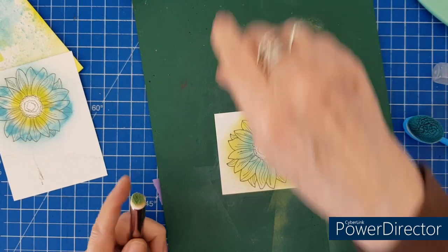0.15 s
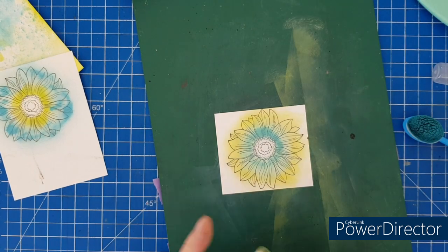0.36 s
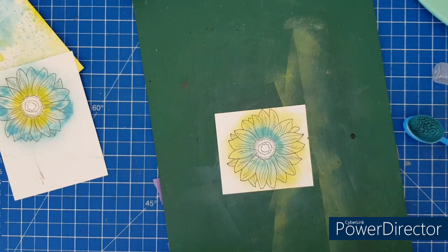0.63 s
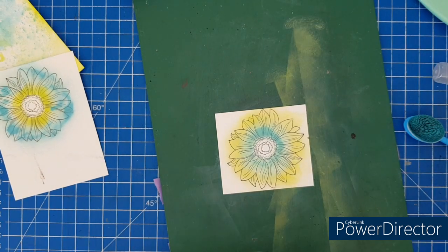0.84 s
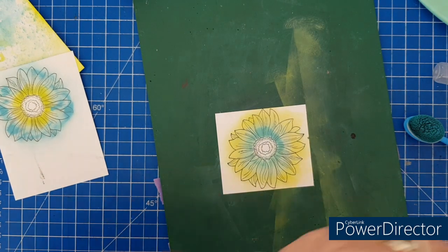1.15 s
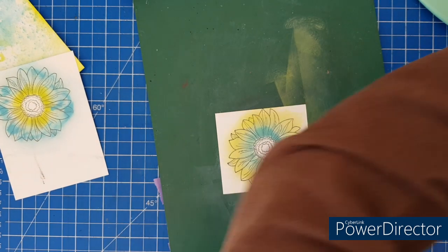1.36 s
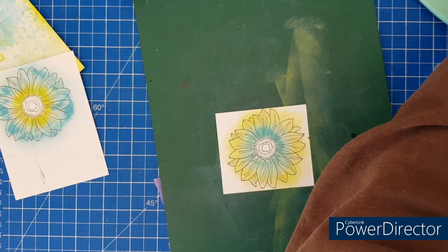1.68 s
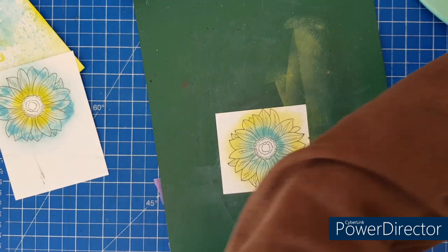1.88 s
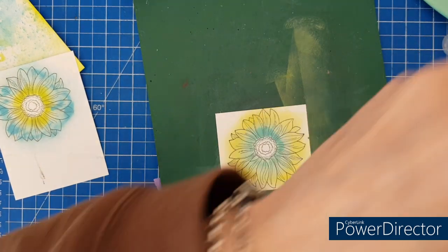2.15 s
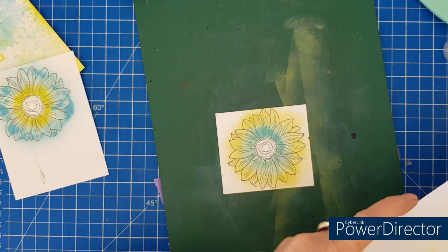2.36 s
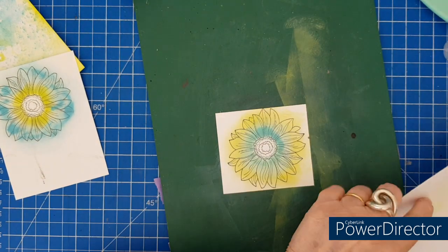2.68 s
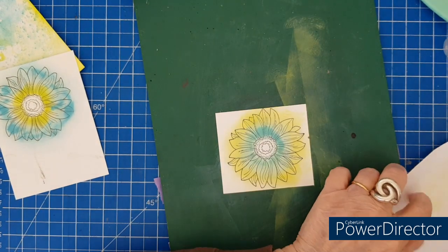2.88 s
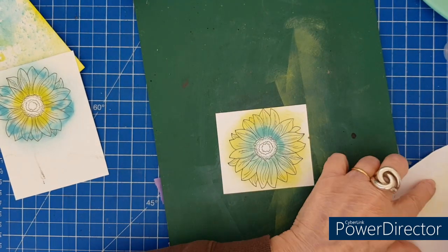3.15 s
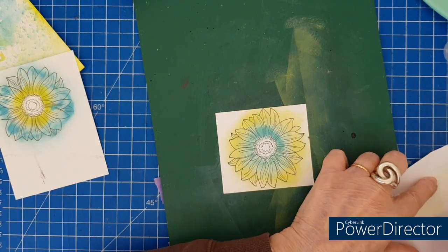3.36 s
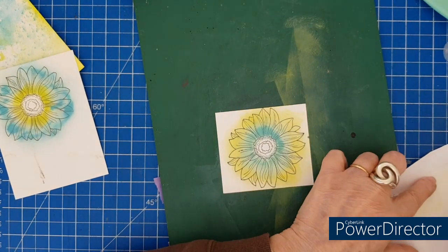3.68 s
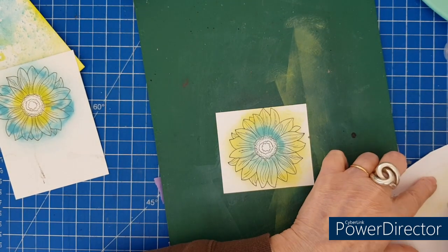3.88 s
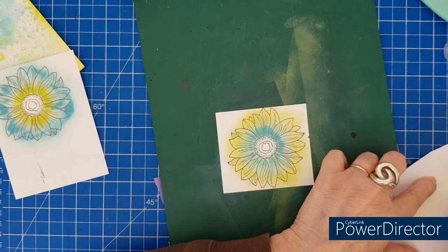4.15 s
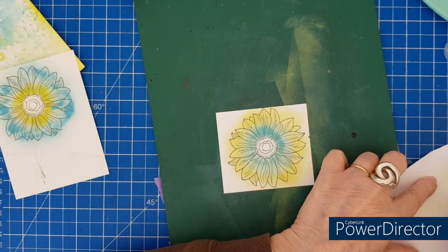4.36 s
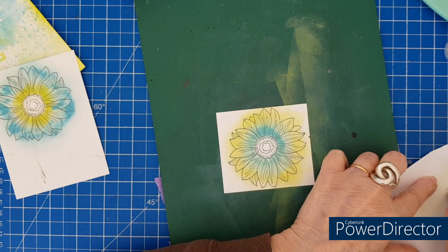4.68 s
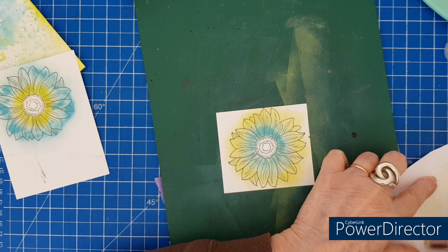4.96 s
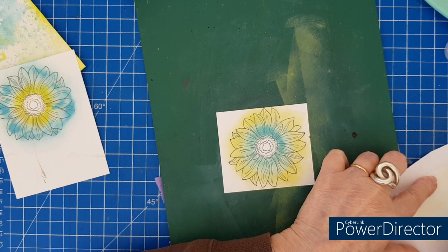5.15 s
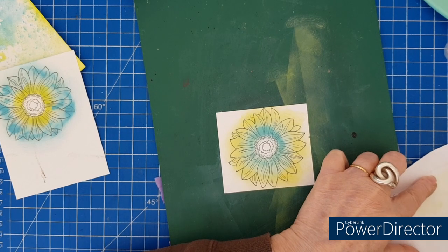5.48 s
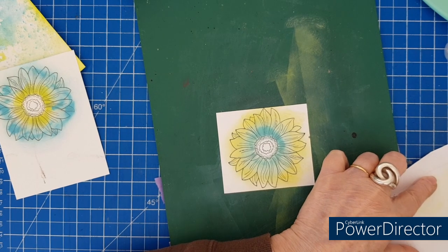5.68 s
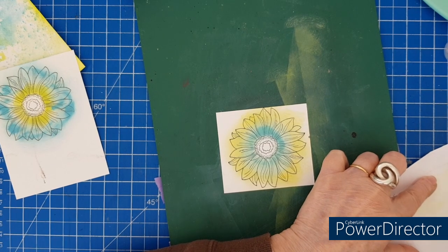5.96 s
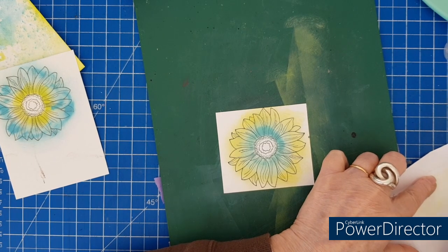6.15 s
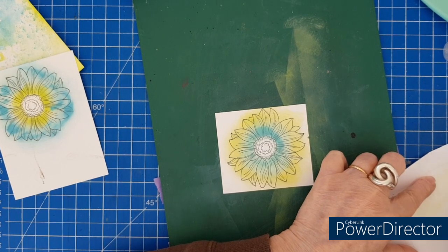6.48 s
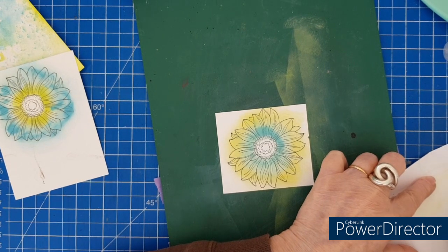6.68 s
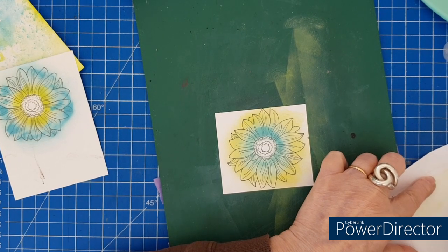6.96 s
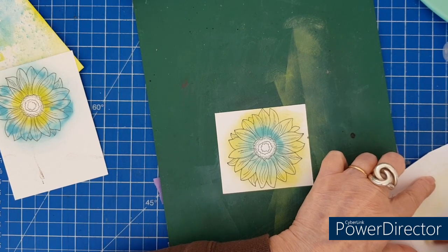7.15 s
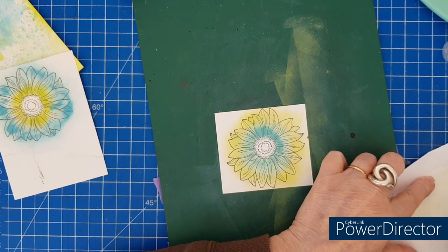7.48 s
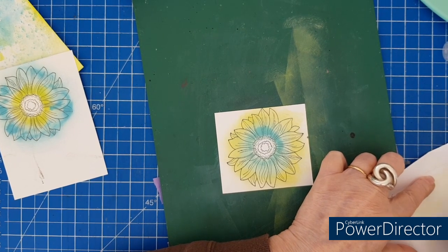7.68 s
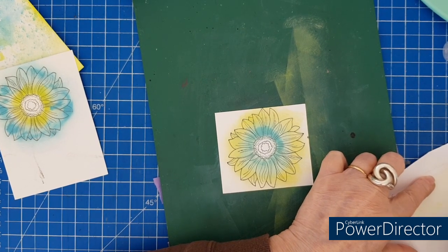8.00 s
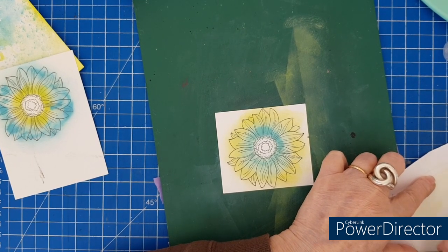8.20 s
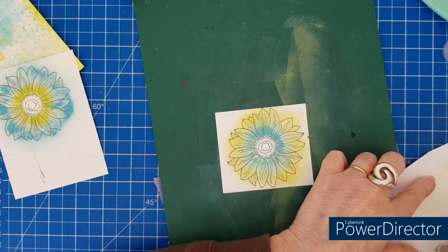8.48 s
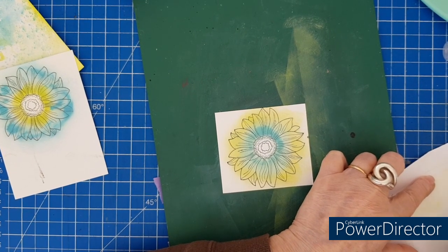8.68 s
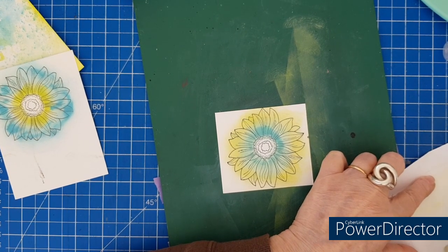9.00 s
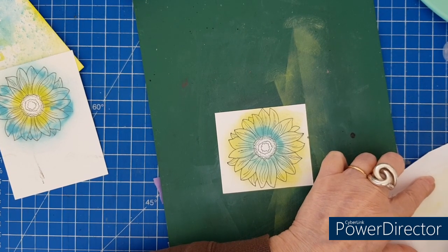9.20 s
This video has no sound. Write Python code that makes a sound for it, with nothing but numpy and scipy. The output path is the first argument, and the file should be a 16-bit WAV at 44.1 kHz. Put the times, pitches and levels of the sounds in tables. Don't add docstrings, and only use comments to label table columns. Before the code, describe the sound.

Card skids and knocks onto a craft mat, paper crinkles and snaps, then a soft brush scrubs quickly in two bouts in a quiet room.

```python
import sys
import numpy as np
from scipy import signal
from scipy.fft import rfft, irfft
from scipy.io import wavfile
from scipy.ndimage import uniform_filter1d, minimum_filter1d

SR = 44100
rng = np.random.default_rng(int(sys.argv[2]) if len(sys.argv) > 2 else 0)


def how_loud(loudness_db):
    steps = np.asarray(loudness_db, float) / 20
    return 10 ** steps


def waveform_to_disk(signal):
    frames = np.transpose(np.atleast_2d(signal))
    scaled = np.clip(frames, -1, 1) * 32767
    samples = np.round(scaled).astype(np.int16)
    wavfile.write(sys.argv[1], SR, samples)


N = 411453

# pitch_hz, level_db (per Hz)
BRISTLE_COLOUR = [(350, -51), (600, -34), (777, -13), (1150, -7), (1730, -15.5), (1900, -14.5), (2010, -16),
                  (2940, -6), (4870, -1), (8970, -2), (11100, 2.5), (14600, -2.5), (15400, -70)]
# start_s, length_s, level_db, table_jolt_db
FIRST_SCRUB = [(3.378, 0.063, -67, -57), (3.457, .11, -61.5, -80), (3.587, 0.074, -58.5, -60),
               (3.7, 0.1, -61, -50), (3.824, 0.068, -56, -73.5), (3.929, 0.065, -58.5, -82),
               (4.061, 0.075, -60, -54), (4.158, 0.062, -60.5, -55), (4.265, 0.089, -58.5, -51),
               (4.386, 0.045, -58, -47.5), (4.516, 0.082, -60, -48.5), (4.627, 0.048, -59, -49.5),
               (4.747, 0.073, -59, -49), (4.86, 0.056, -57, -57.5), (4.979, 0.1, -59, -75),
               (5.1, 0.079, -60.5, -51), (5.243, 0.049, -60, -61), (5.356, 0.061, -57.5, -44)]
# start_s, length_s, level_db, table_jolt_db
SECOND_SCRUB = [(5.98, 0.087, -62.5, -52), (6.117, 0.095, -61.5, -59), (6.263, 0.11, -60.5, -48),
                (6.415, 0.087, -62.5, -56.5), (6.526, 0.089, -61, -84.5), (6.656, 0.075, -62, -58),
                (6.782, 0.096, -64.5, -59), (6.898, 0.081, -62.5, -78), (6.999, 0.067, -58.5, -56),
                (7.121, 0.097, -60.5, -48.5), (7.248, 0.065, -57, -54.5), (7.374, 0.11, -61.5, -54.5),
                (7.502, 0.092, -59.5, -56.5), (7.629, 0.16, -62.5, -64), (7.76, 0.11, -62.5, -59),
                (7.897, 0.17, -64.5, -53), (8.037, 0.059, -59, -65.5), (8.165, 0.3, -69.5, -50),
                (8.306, 0.057, -59, -57.5), (8.448, 0.085, -63, -62), (8.584, 0.078, -63, -61),
                (8.706, .08, -64, -49), (8.828, 0.093, -61, -57), (8.951, 0.073, -62, -51),
                (9.081, 0.095, -62, -54.5), (9.203, 0.039, -62, -49.5), (9.265, 0.015, -59.5, -78),
                (9.306, 0.031, -58.5, -51.5)]
FRESH_HAND, TIRED_HAND = (19, 0.3, 0.34, 22), (52, -2.03, 1.3, 32)


def brush():
    lead_s = .007
    hz = np.fft.rfftfreq(N, 1 / SR)
    hiss = evened(irfft(rfft(spread(N, 1.56, 0.004, 0.1)) * how_loud(read(BRISTLE_COLOUR, hz)), N))
    low_hiss = signal.sosfilt(signal.butter(2, 8000, fs=SR, output="sos"), hiss)
    hiss_level, low_level = np.zeros((2, N))
    whisk = np.zeros((2, N))
    for strokes, hand in [(FIRST_SCRUB, FRESH_HAND), (SECOND_SCRUB, TIRED_HAND)]:
        sag, low_db, back_db, swell = hand
        for k, (start_s, length_s, level_db, _) in enumerate(strokes):
            t = np.arange(0, length_s + 0.24, 1 / SR) - lead_s
            from_middle = np.clip(t, 0, length_s) - length_s / 2
            edge = np.clip((t + 0.0068) / 0.013, 0, 1) * how_loud(-350 * np.maximum(t - length_s, 0))
            drag = how_loud(level_db + 2.0 - sag * from_middle) * edge
            add(hiss_level, start_s - lead_s, drag)

            tip_hz = 4500 * (1 + .13 * rng.uniform(-1, 1))
            tips = band(spread(len(t), 3.0, .003, .3), 3000, 7000)
            tips = evened(resonate(tips, tip_hz, 1000))
            flick = np.exp(-.5 * ((t - .8 * length_s) / .022) ** 2)
            add(whisk, start_s - lead_s, tips * how_loud(level_db - 7.5) * flick)

            way_back = k % 2
            low_boost = how_loud(low_db + back_db * way_back + swell * from_middle) - 1
            add(low_level, start_s - lead_s, drag * low_boost)
    return patchy(hiss_level * hiss + low_level * low_hiss + whisk, 2.2)


# middle_s, length_s, body_db, body_hz, crinkle_db
CARD_SLIDES = [(0.662, 0.32, -69, 870, -73), (1.076, 0.3, -64.5, 660, -67), (1.13, 0.043, -81, 606, -60),
               (1.335, 0.17, -62.5, 595, -55.5), (1.572, .12, -79, 900, -67.5),
               (1.869, 0.23, -61, 1270, -49), (2.03, 0.077, -50.5, 850, -61.5),
               (2.101, 0.11, -41, 825, -57), (1.673, 0.09, -70, 1110, -62.5),
               (2.239, 0.28, -51, 900, -50.5), (2.605, .1, -44, 1450, -46),
               (2.678, 0.12, -51.5, 1050, -46.5), (2.862, 0.3, -67.5, 1140, -53),
               (3.001, 0.22, -64, 1460, -52.5), (3.189, 0.18, -70, 1540, -62), (8.186, .04, -54, 1200, -47),
               (5.4, .14, -60, 1400, -57), (6.277, .032, -49.5, 910, -45.5)]
# middle_s, length_s, fizz_db
SLEEVE_RUBS = [(0.088, .14, -55), (1.2, 0.085, -62.5), (1.438, 0.12, -63.5), (1.515, 0.1, -58.5),
               (1.643, 0.031, -52.5), (1.703, 0.11, -56), (2.006, 0.11, -60), (2.525, 0.12, -52),
               (3.125, 0.095, -66), (3.344, 0.31, -66)]
# start_s, length_s, body_db, body_hz, crinkle_db
CARD_CATCHES = [
    (1.263, 0.035, -65, 620, -53),
    (1.299, 0.038, -57, 1400, -46.5),
    (1.733, 0.032, -45.5, 1510, -49),
    (1.75, .06, -43.5, 950, -48),
    (2.123, 0.046, -38.5, 910, -43),
    (2.172, 0.069, -36.5, 900, -40.5),
    (2.324, 0.05, -47, 1020, -46.5),
    (2.372, 0.094, -50, 756, -71),
    (2.416, 0.07, -47, 740, -46),
    (2.453, .06, -44, 1150, -48),
]
# start_s, length_s, body_db, body_hz, crinkle_db
SHEET_SCUFFS = [
    (4.272, .08, -56, 820, -75),
    (4.75, 0.059, -52.5, 780, -77),
    (5.104, 0.11, -51.5, 860, -51),
    (6.264, 0.1, -51, 970, -49.5),
    (9.198, 0.09, -57.5, 1050, -72),
]
# start_s, length_s, body_db, body_hz, crinkle_db
SHEET_DRAGS = [
    (5.33, 0.24, -52, 910, -63),
    (8.15, .07, -59, 1140, -52),
    (1.705, 0.12, -54, 1030, -48.5),
]
# start_s, length_s, body_db, body_hz, crinkle_db
FIRST_SKID = [
    (0.0, .062, -33.5, 1464, -42.5),
]


def handling():
    out = np.zeros((2, N))
    card = [row + (row[-1] - 0.3,) for row in CARD_SLIDES]
    cloth = [(s, length_s, db - 16, 600, db - 16.5, db) for s, length_s, db in SLEEVE_RUBS]
    for middle_s, length_s, *sound in card + cloth:
        swell_db = -18 * np.linspace(-1, 1, round(length_s * SR)) ** 2
        add(out, middle_s - length_s / 2, paper(swell_db, *sound))
    kinds = [(CARD_CATCHES, (0.0015, 270, -4)), (SHEET_SCUFFS, (.004, 330, -9)),
             (SHEET_DRAGS, (0.036, 430, -1.8)), (FIRST_SKID, (0.0018, 120, -5))]
    for rows, (attack_s, fade, fizz_db) in kinds:
        for start_s, length_s, body_db, body_hz, crinkle_db in rows:
            t = np.arange(0, length_s, 1 / SR)
            shape_db = -fade * np.maximum(t - attack_s, 0) - 14 * np.maximum(1 - t / attack_s, 0)
            add(out, start_s, paper(shape_db, body_db, body_hz, crinkle_db, crinkle_db + fizz_db))
    return out


def paper(shape_db, body_db, body_hz, crinkle_db, fizz_db):
    count = len(shape_db)
    rub = grit(count, 3.2, .004)
    wide = spread(count, 3, .003, .3)
    hollow = evened(resonate(resonate(rub, body_hz, 330), body_hz, 330))
    body = evened(hollow + 1.1 * band(rub, .5 * body_hz, 2.3 * body_hz))
    crinkle = evened(band(wide, 2100, 4300) + .9 * band(wide, 3900, 7000))
    fizz = band(wide, 6000, 16000)
    sound = how_loud(body_db) * body + how_loud(crinkle_db) * crinkle + how_loud(fizz_db - 1.0) * fizz
    return how_loud(shape_db - 1.0) * sound * signal.windows.tukey(count, min(120 / count, 1))


# start_s, length_s, level_db, pitch_hz, width_hz
SINGING_EDGES = [(0.0, 0.047, -38, 1340, 200), (0.018, 0.036, -37.5, 1760, 260),
                 (0.0, 0.045, -44, 3200, 600), (0.0, .05, -49, 2560, 200), (0.01, 0.022, -53, 4980, 700),
                 (0.066, 0.02, -40, 600, 500), (0.066, 0.012, -48, 3900, 700), (1.0, 0.096, -57.5, 129, 30),
                 (1.14, 0.037, -62.5, 150, 50), (1.28, 0.078, -63, 505, 90), (2.078, 0.052, -37, 802, 90),
                 (2.126, 0.01, -43, 2200, 400), (2.17, 0.0075, -38, 1800, 400),
                 (2.372, 0.008, -44, 750, 400), (2.417, 0.025, -44.5, 575, 200),
                 (2.424, 0.009, -43, 1220, 300), (2.42, .008, -45, 3070, 400),
                 (2.585, 0.024, -44.5, 3500, 500), (2.686, .02, -60, 3260, 400),
                 (5.106, 0.05, -53, 4360, 800), (5.338, 0.034, -61, 1490, 300),
                 (5.365, 0.066, -59.5, 3050, 396), (5.4, 0.11, -65, 610, 500),
                 (7.892, 0.052, -58, 140, 60.3), (8.17, .05, -57.5, 140, 60), (8.7, .06, -58.5, 140, 60.1),
                 (6.0, 0.097, -59, 150, 70.3), (4.27, 0.059, -60, 182, 90), (2.811, 0.12, -61, 2920, 500),
                 (2.95, 0.083, -59, 3100, 600), (2.954, 0.083, -65, 5400, 600),
                 (3.107, 0.068, -65, 2920, 400), (1.678, .05, -61, 3200, 300),
                 (5.106, 0.057, -53.5, 131, 50), (1.601, 0.073, -59, 118, 40), (0.0, .05, -42, 800, 500),
                 (2.142, 0.057, -45.5, 1700, 700), (8.27, 0.024, -64, 4500, 900),
                 (8.115, .027, -65.5, 4600, 600)]


def singing():
    out = np.zeros(N)
    for start_s, length_s, level_db, pitch_hz, width_hz in SINGING_EDGES:
        t = np.arange(0, length_s + .05, 1 / SR)
        noise = rng.standard_normal(len(t) + 2000)
        tone = resonate(resonate(noise, pitch_hz, width_hz), pitch_hz, width_hz)
        tone = evened(tone[2000:])
        swing = uniform_filter1d(abs(tone), round(SR / width_hz / 2))
        tone = evened(tone / (.5 + swing))
        fade = how_loud(level_db - 1100 * np.maximum(t - length_s, 0))
        add(out, start_s, tone * np.minimum(t / .003, 1) * fade)
    return out


# start_s, peak_db, ring_hz, edge_db
HAND_KNOCKS = [(0.0291, -19.5, 1200, -44), (0.0645, -22, 700, -24), (0.0643, -24, 1250, -50),
               (7.8975, -51, 260, -75), (0.0836, -36, 610, -32), (8.1825, -46, 1050, -46),
               (1.1263, -55, 1080, -62), (1.3024, -54, 500, -46), (1.7333, -39, 1420, -52),
               (1.751, -47, 550, -55), (2.0027, -41, 840, -53), (2.0384, -34, 850, -48),
               (2.0805, -33, 760, -52), (2.1243, -29, 1100, -40), (2.1515, -32, 800, -42),
               (2.173, -28, 810, -36), (2.1784, -35, 790, -33), (2.1985, -36, 950, -42),
               (2.3266, -25, 1120, -42), (2.3673, -27, 950, -43), (2.4235, -36, 580, -42),
               (2.4519, -30, 1140, -40), (1.7615, -37, 1000, -46), (6.2694, -39, 900, -50),
               (2.5742, -36, 1250, -44), (2.5989, -36, 1070, -40), (2.6099, -34, 1400, -44),
               (4.2709, -40, 800, -58), (4.5146, -49, 750, -58), (4.7491, -39, 800, -60),
               (5.1045, -39, 900, -44), (5.3613, -36, 900, -58), (6.2611, -41, 950, -48),
               (9.2005, -47, 950, -66)]
# start_s, peak_db, edge_hz
CARD_TICKS = [(0.0644, -28, 3300), (0.0648, -33, 4200), (0.0644, -39, 12000), (0.0838, -37, 3100),
              (0.0842, -44, 5000), (0.0838, -47, 12000), (0.1765, -48, 11500), (0.4045, -60, 6500),
              (0.425, -63, 6500), (1.1263, -50, 3000), (1.1263, -54, 7000), (1.196, -54, 11000),
              (1.3024, -48, 11000), (1.711, -52, 8000), (1.7345, -40, 2000), (1.742, -48, 4000),
              (1.751, -36, 2000), (1.751, -42, 3700), (1.751, -50, 11000), (1.845, -48, 10000),
              (2.1246, -32, 2100), (2.1243, -34, 3500), (2.1248, -39, 4800), (2.1243, -35, 12000),
              (2.1335, -38, 2300), (2.1515, -37, 2000), (2.1515, -37, 3500), (2.1517, -39, 5000),
              (2.1515, -49, 12000), (2.1729, -32, 1900), (2.1731, -36, 3400), (2.1729, -29, 5200),
              (2.1731, -31, 6800), (2.1729, -34, 12000), (2.1784, -39, 4800), (2.1786, -44, 6900),
              (2.1918, -39, 3600), (2.192, -41, 4900), (2.2005, -46, 6800), (2.3158, -41, 3600),
              (2.3158, -44, 6300), (2.3158, -41, 10500), (2.417, -47, 11000), (2.4265, -42, 3050),
              (2.4517, -39, 3500), (2.4519, -42, 6500), (2.4517, -43, 9800), (2.573, -51, 3600),
              (2.5975, -40, 1900), (2.599, -40, 3600), (2.6006, -42, 3600), (2.6099, -42, 3700),
              (2.6099, -41, 7400), (2.65, -46, 5000), (2.6505, -45, 1900), (2.6925, -47, 3300)]
# start_s, peak_db, edge_hz
SHEET_SNAPS = [(2.878, -51, 2900), (2.916, -48, 3500), (2.9161, -45, 5200), (2.916, -41, 7500),
               (2.9161, -42, 9500), (2.916, -38, 12500), (3.036, -51, 2900), (3.183, -49, 3100),
               (3.1878, -46, 3200), (3.1878, -58, 6500), (3.1895, -55, 1700), (4.5146, -54, 8100),
               (4.7491, -52, 11500), (4.7491, -56, 6800), (4.271, -52, 11500), (4.9859, -48, 6600),
               (5.1044, -29, 4700), (5.1046, -37, 3400), (5.1105, -40, 4400), (5.114, -41, 4000),
               (5.9773, -56, 4300), (6.2611, -37, 5000), (6.2611, -42, 7800), (6.2611, -41, 12500),
               (6.2694, -44, 5000), (6.2694, -45, 8200), (6.2745, -45, 5600), (7.8965, -54, 9000),
               (8.1535, -52, 4400), (8.183, -46, 2800), (8.1894, -39, 3300), (8.1897, -45, 5000),
               (8.7835, -35, 12500), (8.7835, -42, 9200), (8.791, -45, 7900)]
# time_s, left_port_delay (samples)
HAND_DELAY = [(0.5, -1), (1.13, 3), (1.3, 11), (2.0, 11), (2.03, 6), (2.174, 6), (2.178, 1), (2.2, 1),
              (2.3, 11), (2.33, 9), (2.45, 11), (2.9, 8)]


def taps():
    out, t = np.zeros((2, N)), np.arange(3000) / SR
    tilt_db, right_db = .8, 1.5
    ticks = [(s, db - 32, 1000, db + 4.5 + tilt_db * np.log2(hz / 4000), hz)
             for s, db, hz in CARD_TICKS + SHEET_SNAPS]
    rows = [row + (2500,) for row in HAND_KNOCKS] + ticks
    noises = rng.standard_normal((len(rows), 3, len(t)))
    for (start_s, peak_db, ring_hz, edge_db, edge_hz), noise in zip(rows, noises):
        fall_db = -60 * t * ring_hz / 11
        ring = np.sin(2 * np.pi * ring_hz * t) * how_loud(fall_db)
        rough = band(noise[0], 0.45 * ring_hz, 1.92 * ring_hz)
        rattle = .45 * np.minimum(t * ring_hz / 1.5, 1) * rough * how_loud(0.91 * fall_db)

        splinters = .18 * noise[1:] * how_loud(-60 * t / .011)
        snap = (t == 0) + splinters
        wide = band(snap, .5 * edge_hz, min(1.7 * edge_hz, 17000))
        edge = .22 * wide + evened(resonate(wide, edge_hz, .25 * edge_hz))
        edge = edge / abs(edge).max()

        tap = how_loud(peak_db + 2.5) * (ring + rattle) + how_loud(edge_db + 4) * edge
        late = np.interp(start_s, *np.transpose(HAND_DELAY))
        add(out[0], start_s + late / SR / 2, tap[0] / how_loud(right_db / 2))
        add(out[1], start_s - late / SR / 2, tap[1] * how_loud(right_db / 2))
    return out


# pitch_hz, width_hz, level_db
TABLE_MODES = [(50, 13, 2), (75, 20, -3), (100, 25, -7), (130, 30, -6), (175, 35, -10), (250, 50, -13)]
# time_s, rumble_db
ARM_WEIGHT = [(0, -69), (.4, -60.5), (1.1, -52.5), (1.53, -60), (2.5, -52), (3.15, -56), (3.6, -62),
              (4.55, -58), (5.3, -62), (5.7, -72), (6.5, -66), (7.1, -58), (8.6, -63.5), (9.33, -54.5)]
# start_s, rumble_db, drum_db
TABLE_THUDS = [(0.072, -60, -35), (1.1, -88, -60), (1.789, -54, -45.5), (2.08, -65.5, -35),
               (2.468, -59.5, -48), (3.19, -74, -59), (3.33, -55.5, -62), (4.55, -66.5, -71),
               (4.75, -56, -50), (5.122, -46, -67), (5.379, -40.5, -54), (6.0, -63, -50.5),
               (6.29, -44.5, -40.5), (7.9, -57, -52.5), (8.698, -71, -70)]


def table():
    t = np.arange(N) / SR
    rumble = how_loud(np.interp(t, *np.transpose(ARM_WEIGHT)))
    boom = how_loud(-75) * np.ones(N)
    for start_s, rumble_db, drum_db in TABLE_THUDS:
        near = t[:SR // 2] - .07
        shape = how_loud(-np.maximum(-770 * near, 150 * near))
        add(rumble, max(start_s - .07, 0), how_loud(rumble_db) * shape)
        add(boom, max(start_s - .07, 0), how_loud(drum_db) * shape)
    stir = rumble * how_loud(-5.5) * grit(N, 1.5, 0.011)
    push, blow = np.zeros(N), np.hanning(420)
    for start_s, _, _, jolt_db in FIRST_SCRUB + SECOND_SCRUB:
        add(push, start_s, how_loud(jolt_db) * blow / blow.sum())
    stirred = sum(how_loud(db) * resonate(stir, hz, 0.5 * w) / np.sqrt(w) for hz, w, db in TABLE_MODES)
    struck = sum(how_loud(db) * resonate(push, hz, w) * SR / (2 * np.pi * w) for hz, w, db in TABLE_MODES)
    drum = boom * how_loud(-13.0) * band(grit(N, 2.4, 0.046), 90, 480)
    return evened(stirred) * np.std(stir) + how_loud(7.0) * struck + drum


# pitch_hz, t60_s
ECHO_DECAY = [(150, 0.46), (600, 0.41), (2000, 0.37), (6000, 0.41), (14000, 0.26)]
# pitch_hz, likeness (0 to 1)
ECHO_LIKENESS = [(100, 0.87), (500, 0.094), (1500, 0.53), (3000, 0.021)]


def room(x):
    echoes = np.zeros((2, SR // 2))
    jitter = rng.integers(0, 20, (2, (SR // 2 - 121) // 20))
    at = np.arange(120, SR // 2 - 20, 20) + jitter
    np.put_along_axis(echoes, at, rng.choice([-1., 1.], at.shape), 1)
    hz, t, z = signal.stft(echoes, SR, nperseg=256)
    alike = np.clip(read(ECHO_LIKENESS, hz), 0, 1)[:, None]
    z[1] = alike * z[0] + np.sqrt(1 - alike ** 2) * z[1]
    decay = how_loud(-60 * t / read(ECHO_DECAY, hz)[:, None])
    tail = signal.istft(z * decay, SR, nperseg=256)[1]
    return signal.fftconvolve(x, tail / np.linalg.norm(tail[0]), axes=1)[:, :N]


# pitch_hz, level_db (per Hz)
HUSH_COLOUR = [(18, -29), (30, 14), (173, -11), (219, -10.5), (307, -12.5), (332, -29.5), (388, -20.5),
               (491, -5.5), (545, -21.5), (1430, -22.5), (2350, -29), (5000, -28.5), (8040, -32.5),
               (12900, -20), (14800, -22)]
# pitch_hz, likeness (-1 to 1)
HUSH_LIKENESS = [(60, 0.61), (180, 0.94), (550, -0.26), (1650, -0.35), (4970, 0.18), (15000, -0.42)]
# pitch_hz, level_db
FAR_HUM = [(394, -78), (494, -82)]


def hush():
    frames, hz = N // 256 + 5, np.fft.rfftfreq(1024, 1 / SR)
    a, b, c, d = rng.standard_normal((frames, 513, 4)).T
    alike = np.clip(read(HUSH_LIKENESS, hz), -1, 1)[:, None]
    left, own = a + 1j * b, c + 1j * d
    right = alike * left + np.sqrt(1 - alike ** 2) * own
    z = np.array([left, right]) * how_loud(read(HUSH_COLOUR, hz)[:, None])
    floor = evened(signal.istft(z, nperseg=1024, noverlap=768)[1][:, :N])
    hum = sum(how_loud(db) * evened(resonate(rng.standard_normal(N), hum_hz, 4.0)) for hum_hz, db in FAR_HUM)
    return how_loud(-61) * floor + hum


def grit(count, slip_db, slip_s):
    noise, flicker = rng.standard_normal((count, 2)).T
    flicker = evened(uniform_filter1d(flicker, max(round(slip_s * SR), 1)))
    return evened(noise * how_loud(slip_db * flicker))


def spread(count, slip_db, slip_s, share):
    common = grit(count, slip_db, slip_s)
    own = rng.standard_normal((2, count)) * uniform_filter1d(abs(common), 60) * 0.99
    return np.sqrt(np.clip(share, 0, 1)) * common + np.sqrt(np.clip(1 - share, 0, 1)) * own


def patchy(x, patch_db):
    z = signal.stft(x, nperseg=512)[2]
    patches = uniform_filter1d(rng.standard_normal(z.shape[1:]), size=8, axis=0)
    patches = uniform_filter1d(patches, size=7, axis=1)
    return signal.istft(z * how_loud(patch_db * evened(patches)), nperseg=512)[1][:, :N]


def notched(x):
    return x - 0.38 * signal.lfilter(*signal.iirpeak(8870, 3.0, SR), x)


def resonate(x, hz, width_hz):
    r = np.exp(-np.pi * width_hz / SR)
    return 2 * signal.lfilter([1 - r], [1, -r * np.exp(2j * np.pi * hz / SR)], x + 1e-18).real


def band(x, low_hz, high_hz):
    return evened(signal.sosfilt(signal.butter(3, [low_hz, high_hz], "bandpass", fs=SR, output="sos"), x))


def evened(x):
    return x / np.sqrt(np.mean(x ** 2) + 1e-20)


def read(points, hz):
    f, value = np.transpose(points)
    return np.interp(np.log(hz + 1), np.log(f + 1), value)


def add(mix, start_s, sound):
    part = mix[..., round(start_s * SR):][..., :sound.shape[-1]]
    part += sound[..., :part.shape[-1]]


def scene():
    sheet = notched(patchy(handling(), 1.7) + singing())
    bristles = brush() * how_loud(np.array([[-.7], [.7]]))
    rubbing = sheet + bristles
    lag = 8
    rubbing[0, SR // 2:] = rubbing[0, SR // 2 - lag:-lag].copy()
    knocks, wood = notched(taps()), table()
    to_room = how_loud(-8.5) * sheet + how_loud(-7.5) * knocks + how_loud(-6.5) * bristles + how_loud(-13) * wood
    return rubbing + knocks + room(to_room) + wood + hush()


def gate(x, under_db, depth_db):
    hz, _, z = signal.stft(x, SR, nperseg=1024, noverlap=768)
    power = uniform_filter1d((abs(z) ** 2).mean(0), size=4, axis=0)
    power = uniform_filter1d(power, size=8, axis=1)
    level_db = 10 * np.log10(power + 1e-20)
    treble_db = np.percentile(level_db[(hz > 4000) & (hz < 14000)], 90, axis=0)
    treble_db = uniform_filter1d(minimum_filter1d(treble_db, size=13), size=13)
    wander = uniform_filter1d(rng.standard_normal(power.shape), size=4, axis=0)
    wander = uniform_filter1d(wander, size=16, axis=1)
    level_db += 2.4 * evened(wander)
    shut = 1 / (1 + np.exp((level_db - treble_db + under_db) / .25))
    return signal.istft(z * how_loud(-depth_db * shut), SR, nperseg=1024, noverlap=768)[1][:, :N]


def roll_off(x):
    return signal.sosfilt(signal.butter(12, 15600, fs=SR, output="sos"), x)


def record(dry):
    gated = gate(dry, under_db=11.7, depth_db=30)
    low_cut = signal.sosfilt(signal.butter(4, 42, "highpass", fs=SR, output="sos"), gated)
    top_edge = signal.firwin(301, 14600, window=("kaiser", 1.5), fs=SR)
    mix = signal.oaconvolve(low_cut, top_edge[None], "same")
    return roll_off(mix)


dry = scene()
out = record(dry)
waveform_to_disk(out)
```